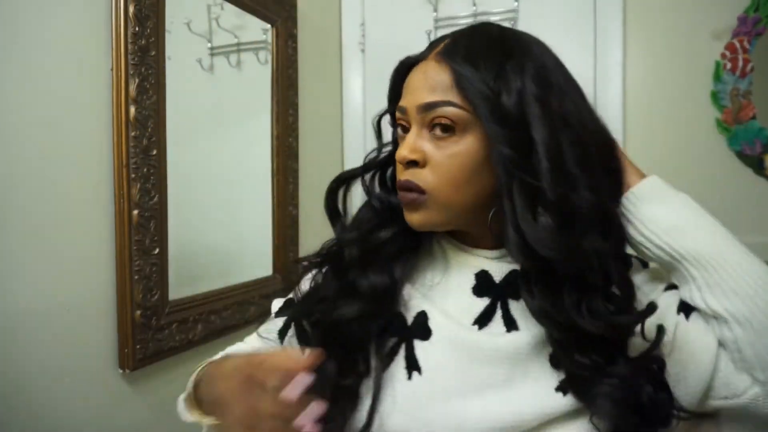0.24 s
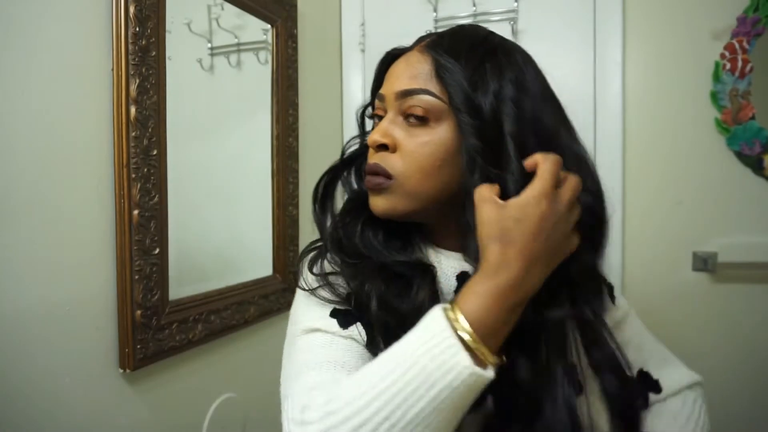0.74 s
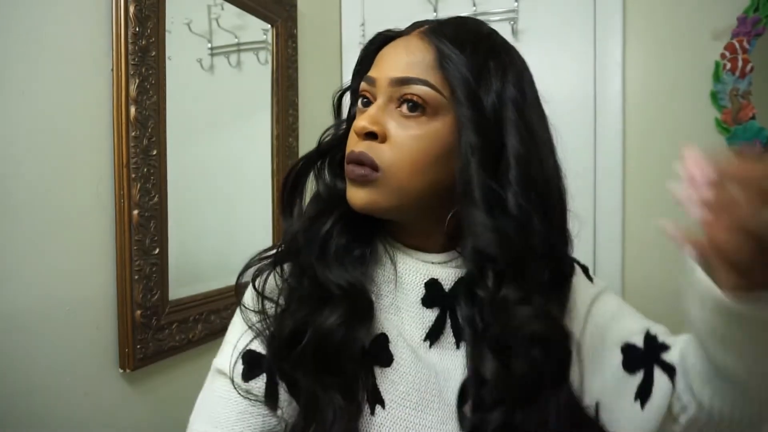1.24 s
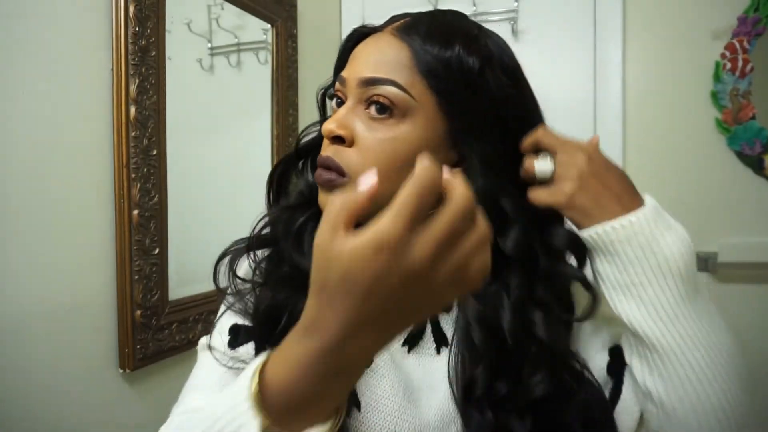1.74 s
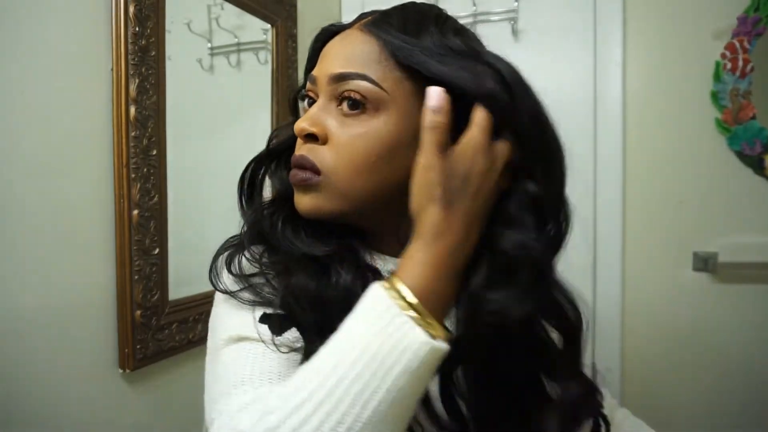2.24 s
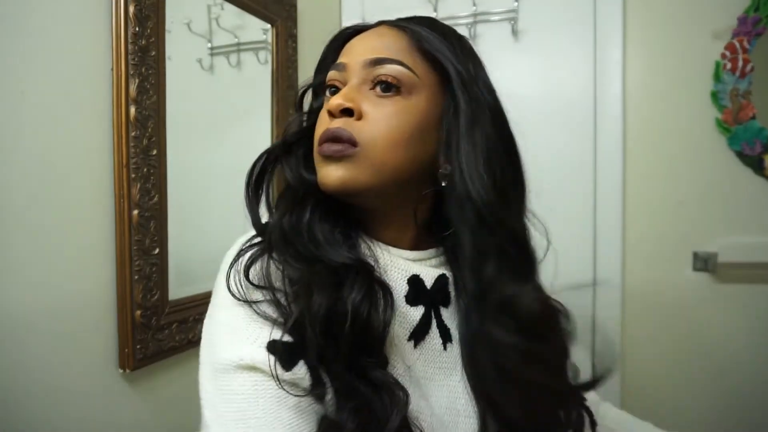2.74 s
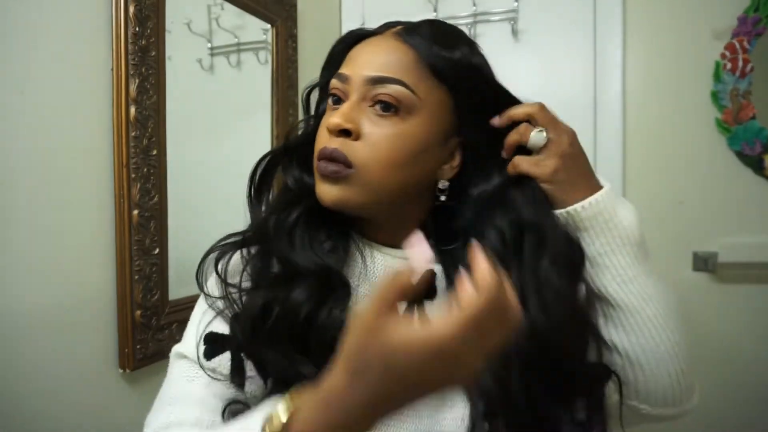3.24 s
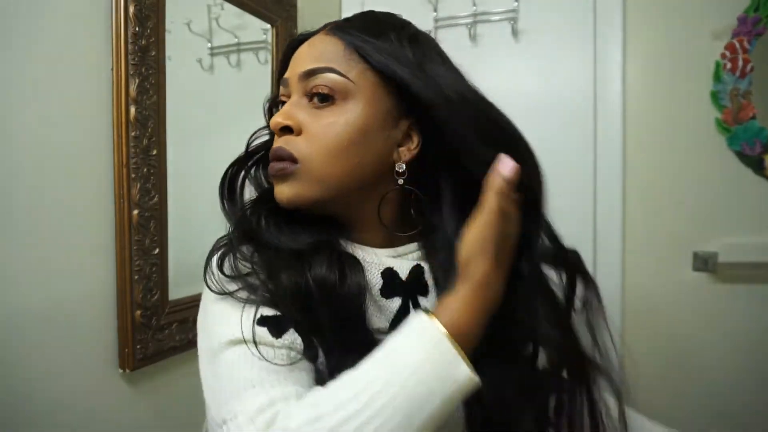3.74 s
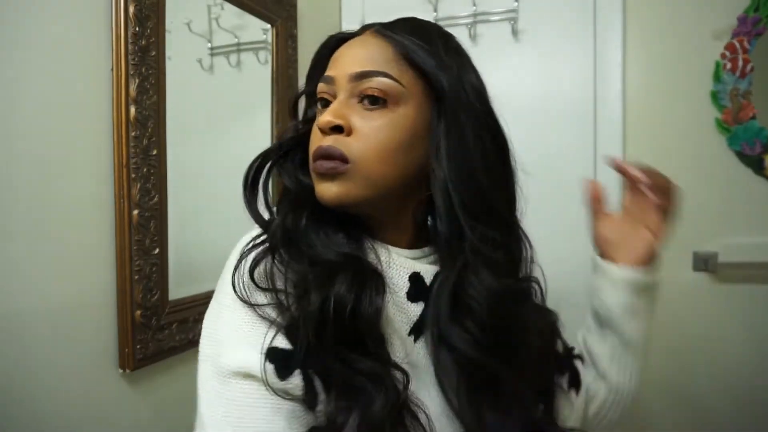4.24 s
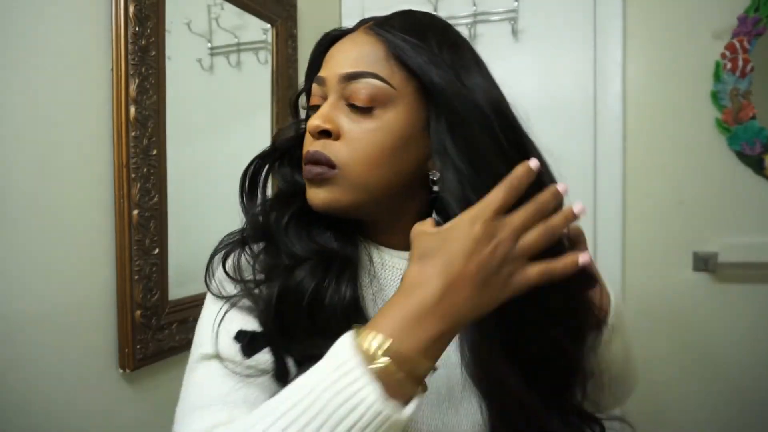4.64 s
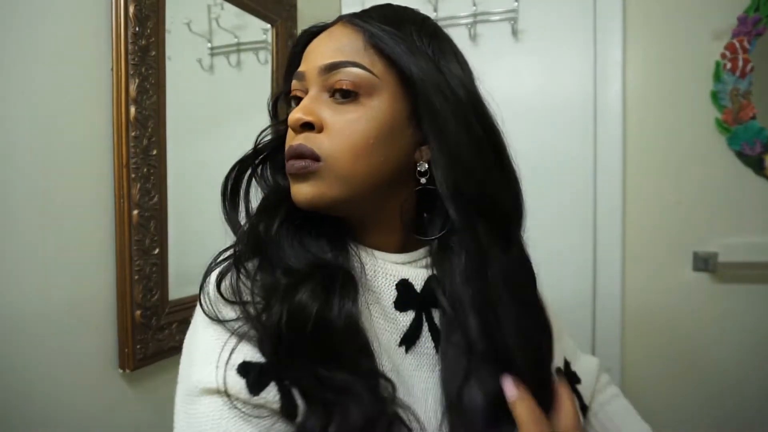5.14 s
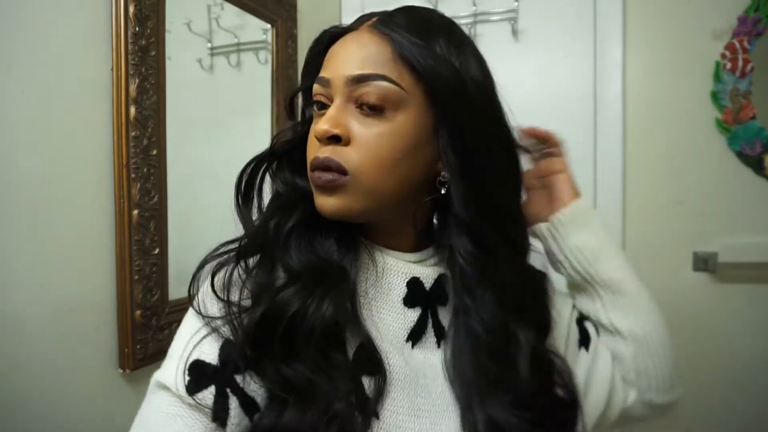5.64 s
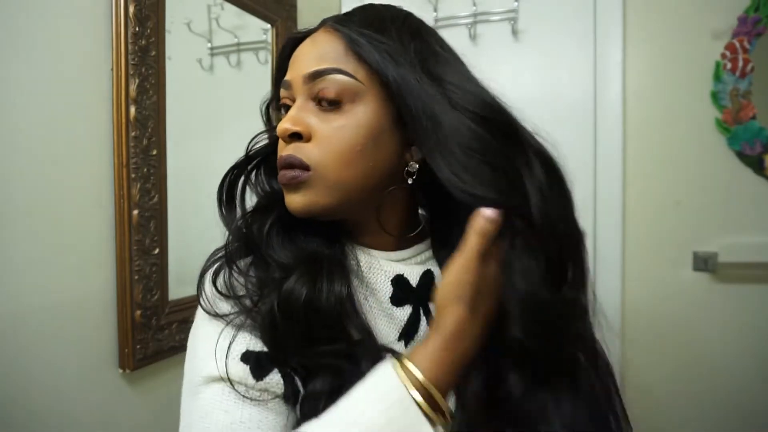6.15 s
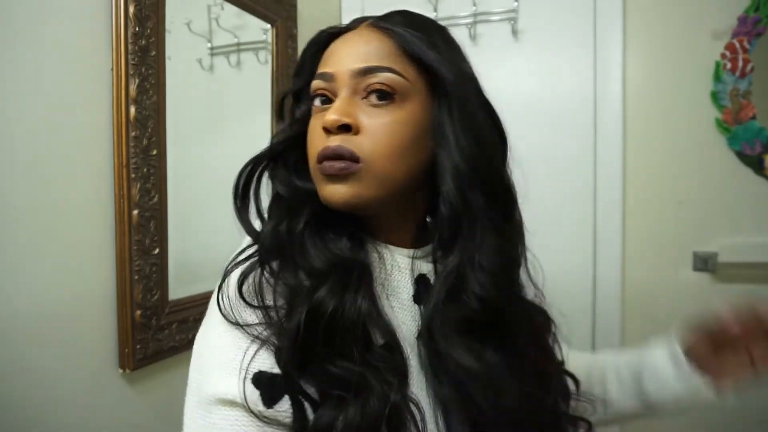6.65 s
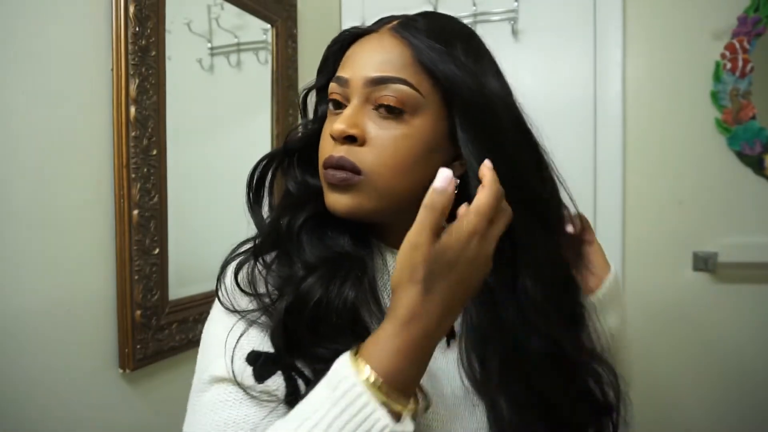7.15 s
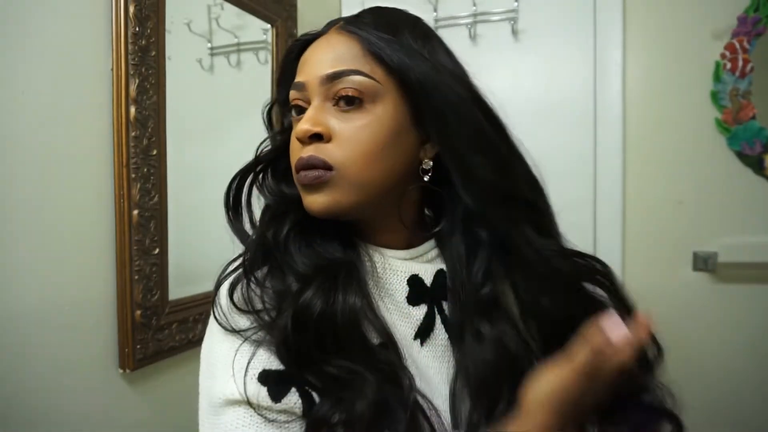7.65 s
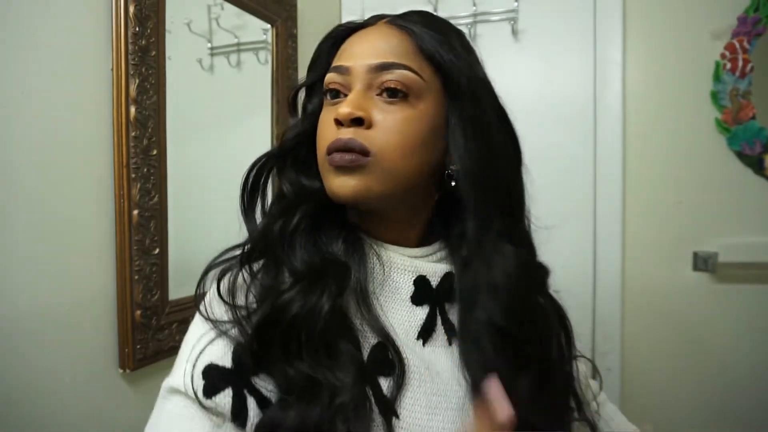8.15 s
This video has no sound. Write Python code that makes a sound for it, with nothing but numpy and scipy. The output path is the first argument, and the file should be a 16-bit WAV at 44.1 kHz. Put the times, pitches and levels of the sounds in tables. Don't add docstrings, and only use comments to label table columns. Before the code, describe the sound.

Two metal bangles jingle and chatter in bright uneven bursts as hands comb long hair, over a steady low fan hum in a small tiled room.

```python
import sys
import numpy as np
from scipy import signal
from scipy.fft import rfft, irfft, next_fast_len
from scipy.io import wavfile
from scipy.ndimage import uniform_filter1d, minimum_filter1d

SR = 44100
rng = np.random.default_rng(int(sys.argv[2]) if len(sys.argv) > 2 else 0)


def volts_from_decibels(level):
    exponent = np.asarray(level, float) / 20
    return 10 ** exponent


def log_audio(samples):
    frames = np.atleast_2d(samples).T
    limited = np.clip(frames, -1, 1)
    pcm = np.round(limited * 32767).astype(np.int16)
    wavfile.write(sys.argv[1], SR, pcm)


N = 369999

# (frequency [Hz], density [dB per Hz])
AIR_SPECTRUM = [(20, -11.5), (48, -54), (95, -6), (140, -9.5), (200, -10), (300, -10.5), (500, -18),
                (730, -24), (1000, -28), (1510, -31.5), (3940, -36), (6910, -43.5), (13200, -39.5),
                (16000, -39.5)]
# (frequency [Hz], side over mid [dB])
AIR_WIDTH = [(60, -37), (150, -18.5), (380, -8.5), (950, 0.5), (2380, -3), (5980, 6.5), (15000, 0)]
# (frequency [Hz], bandwidth [Hz], level [dB])
DUCT_RESONANCES = [(73.9, 14.2, -54.5), (135.7, 4.7, -60), (220.8, 12.5, -56.5), (332.6, 18, -64.5),
                   (1101, 35, -74.5)]
# (frequency [Hz], level [dB rms])
MOTOR_HUM = [(120, -48.5), (240, -58), (360, -68.5), (480, -71.5)]
# (frequency [Hz], t60 [s])
ROOM_DECAY = [(300, 0.59), (2500, 0.33), (8000, 0.29), (15000, 0.19)]
# (frequency [Hz], level [dB])
RUSTLE_BODY_SPECTRUM = [(500, -45), (1100, -5.5), (1600, -11), (2300, -2), (3300, -7), (5000, -13),
                        (7000, -25.5), (16000, -45)]
# (frequency [Hz], level [dB])
RUSTLE_SHEEN_SPECTRUM = [(2000, -40), (4000, -17), (8000, -3), (12000, -4.5), (15500, -29)]
# (peak time [s], level [dB], swell [s], fade [s], sheen above the body [dB])
HAIR_STROKES = [(.1, -57.5, 0.4, 0.093, -27), (.21, -60.5, 0.068, 0.44, -19),
                (.42, -55.5, 0.54, 0.26, -9.5), (.65, -59.5, 0.36, 2.7, -13),
                (0.935, -47.5, .005, 0.18, -18), (1.45, -72, 0.38, 1, -2), (1.85, -59.5, 0.99, 0.53, -10),
                (2.123, -44, 0.004, 0.027, -12), (2.45, -71, 0.43, 0.63, 5.5), (2.78, -62.5, 0.36, .8, -16),
                (3.08, -67, 0.065, 0.072, -7), (3.34, -62, 0.14, 3.6, -2), (4.04, -58.5, 0.3, 0.34, -16),
                (4.37, -54.5, 0.34, 0.13, -23), (4.55, -61.5, 0.54, 1.4, -9), (4.7, -51, 0.059, 0.13, 9),
                (5.21, -51.5, 0.17, 0.24, -13), (5.3, -52, 0.22, 0.081, -8), (5.65, -60.5, 0.75, 0.25, -2),
                (5.77, -61.5, 0.11, 4.8, -5), (6.47, -55, 0.096, 0.095, -7), (6.99, -56, 0.073, 0.51, 0.5),
                (7.2, -63, 0.54, 2.6, -17), (8.39, -74, .2, .2, -4)]
# (time [s], nail [dB], thud [dB], snap [dB], edge [dB])
NAIL_TICKS = [(0.1992, -49, -57, -63, -60), (0.9305, -42, -55, -41.5, -70), (1.3396, -44.5, -73, -63, -47),
              (2.1214, -48, -43, -44, -58), (3.0698, -44.5, -90, -74, -45.5),
              (4.3602, -51.5, -56, -65, -68), (4.4387, -70, -64, -77, -74), (4.4932, -59, -59, -68, -68),
              (5.6344, -52.5, -77, -63, -57), (6.4632, -62, -49.5, -56, -69),
              (6.8773, -50.5, -79, -92, -60)]
# (from [Hz], to [Hz], level [dB])
TICK_LAYERS = [
    (2330, 3650, 12.5),
    (269, 700, 8.5),
    (865, 2840, 5.5),
    (7600, 9500, 11.5),
    (11200, 14800, 10),
]
THIN_MODES_HZ = [1245, 1272, 3950, 4067, 7967, 8188, 9380, 9475, 10350, 12860, 13066, 13370, 13570, 14530,
                 6060, 10900]
# (level [dB], t60 [s])
THIN_MODES = [(-16.5, 0.054), (-12.5, 0.17), (-1.5, 0.16), (5.5, 0.11), (1, 0.084), (3, 0.04), (-37, 0.054),
              (-9.5, 0.033), (-19, 0.061), (-46, .08), (-3, 0.08), (0.5, 0.045), (-25, .08), (-18, .06),
              (-13, 0.027), (-24.5, 0.15)]
WIDE_MODES_HZ = [1930, 1985, 3652, 3792, 5490, 5891, 6101, 8614, 8917, 9175, 11500, 11765, 12150, 12240,
                 15120, 15410]
# (level [dB], t60 [s])
WIDE_MODES = [(2, 0.091), (1, 0.12), (-1.5, 0.087), (2.5, 0.036), (-13, 0.07), (-4.5, 0.1), (3.5, 0.059),
              (-2, 0.05), (1, 0.049), (-4, 0.044), (-17, 0.11), (-0.5, 0.057), (5.5, 0.032), (-32, 0.05),
              (-13, 0.1), (3, 0.049)]
# (from [Hz], to [Hz])
THIN_TILT_HZ = (4070, 13200)
# (from [Hz], to [Hz])
WIDE_TILT_HZ = (1960, 11900)
# (time [s], thin level [dB], wide level [dB],
# thin brightness [dB per octave], wide brightness [dB per octave])
WRIST_CLASHES = [(0.0, -39.5, -41, 13, 8.2), (0.16, -37.5, -45, 11, 4.4), (0.4037, -46, -52, 10, 4),
                 (1.25, -55, -64, 6.7, 2.7), (1.4165, -32, -43, 11.3, 3.7), (1.58, -39.5, -51, 11.3, 10),
                 (2.7244, -30.5, -30.5, 13, 22), (3.2578, -22, -31.5, 12.3, 8.5),
                 (3.388, -38, -39.5, 12.7, 4), (3.8774, -64, -56, 4, 4), (4.2423, -32.5, -32.5, 9.1, 7.5),
                 (4.5954, -30, -36.5, 14.7, 8), (4.686, -18.5, -22.5, 16, 9.5), (5.153, -52, -48, 10, 6),
                 (5.3608, -48, -40.5, 10.7, 6.3), (5.668, -31, -33.5, 16, 11.3),
                 (5.791, -25.5, -24, 11.3, 6.8), (6.501, -35, -35.5, 16.6, 8.3),
                 (6.981, -46.5, -40, 3.8, 11.6), (7.107, -23, -27.5, 12.7, 8.2), (7.725, -52, -57, 12, 4),
                 (7.8982, -36, -44, 7.6, 8), (8.136, -35, -45, 17, 12), (8.288, -41, -42, 8.7, 8)]
# (time [s], thin level [dB], wide level [dB], brighter
# than the clash before [dB per octave])
BOUNCES = [(1.592, -34.5, -36.5, 3.5), (1.604, -38.5, -43.5, -2.5), (2.759, -25, -42, 6),
           (2.795, -31, -55, -2.5), (2.829, -28.5, -42, -3.5), (3.273, -24.5, -45, 0),
           (3.299, -21, -31.5, 5.5), (3.435, -36, -39, 20), (3.92, -64, -58, -3.5), (4.052, -66, -57.5, 3),
           (4.259, -21, -34.5, 17), (4.305, -50, -61, 7), (4.608, -15.5, -32, 6.5),
           (4.6487, -37.5, -67, -10.5), (4.749, -55, -60, -6), (5.198, -45.5, -46.5, -2.5),
           (6.814, -60, -59, -5), (5.3776, -26.5, -35.5, 1), (5.43, -24, -32.5, 6), (5.742, -41, -35.5, -4),
           (5.8385, -30.5, -42, .1), (5.8785, -21.5, -24.5, 2), (5.9294, -30, -40, 12),
           (6.538, -28, -46, -1.3), (6.583, -24.5, -39, -0.5), (6.63, -29, -37, 0.5),
           (7.9215, -24.5, -44, 6.5), (7.9825, -31.5, -31.5, 4.5), (8.3145, -44, -39.5, -0.5),
           (8.364, -32, -43, 4)]


def evened(x):
    return x / np.sqrt(np.mean(x ** 2) + 1e-20)


def read(points, hz):
    f, value = np.transpose(points)
    return np.interp(np.log(hz + 1), np.log(f + 1), value)


def tint(x, points):
    size = next_fast_len(N)
    gain = volts_from_decibels(read(points, np.fft.rfftfreq(size, 1 / SR)))
    return irfft(rfft(x, size) * gain, size)[..., :N]


def ring(x, hz, width_hz):
    r = np.exp(-np.pi * width_hz / SR)
    w = 2 * np.pi * hz / SR
    return signal.lfilter([0, r * np.sin(w)], [1, -2 * r * np.cos(w), r * r], x)


def drift(hz):
    return evened(ring(rng.standard_normal(N), 1e-3, hz))


def fan():
    mid_noise, side_noise = rng.standard_normal((2, N))
    mid = tint(mid_noise, AIR_SPECTRUM)
    side = tint(tint(side_noise, AIR_SPECTRUM), AIR_WIDTH)
    air = volts_from_decibels(-52.5) * np.array([mid + side, mid - side]) / np.std(mid)

    duct = np.zeros(N)
    for hz, width_hz, db in DUCT_RESONANCES:
        resonance = ring(ring(rng.standard_normal(N), hz, width_hz), hz, width_hz)
        duct += volts_from_decibels(db) * evened(resonance)

    t = np.arange(N) / SR
    waver = 0.45 * drift(4.1)
    hum = np.zeros(N)
    for hz, db in MOTOR_HUM:
        hum += volts_from_decibels(db + 2.5) * np.sin(2 * np.pi * (hz * t + rng.random()) + waver)
    return air + duct + hum * volts_from_decibels(0.54 * drift(7.3))


def room(x, wet_db, count=3):
    slots = np.arange(200, SR // 3 - 20, 20)
    turn = np.arange(N) / SR * 9.0 + rng.random() * np.pi
    out = x + np.zeros((2, N))
    for k in range(count):
        taps = np.zeros((2, SR // 3))
        at = slots + rng.integers(0, 20, (2, len(slots)))
        np.put_along_axis(taps, at, rng.choice([-1., 1.], (2, len(slots))), 1)
        hz, t, z = signal.stft(taps, SR, nperseg=128)
        build = 1 - np.exp(-t / 0.00057)
        decay = volts_from_decibels(-60 * t / read(ROOM_DECAY, hz)[:, None])
        tail = signal.istft(z * build * decay, SR, nperseg=128)[1]
        tail = tail + 0.073 * tail[::-1]
        tail /= np.linalg.norm(tail[0])
        share = np.sqrt(2 / count) * np.cos(turn + k * np.pi / count) if count > 1 else 1
        out += volts_from_decibels(wet_db) * signal.oaconvolve(x * share, tail, axes=1)[:, :N]
    return out


def strokes():
    rest_db, rest_sheen_db = -71, -2
    t = np.arange(0, N, 64) / SR
    peak_s, db, swell_s, fade_s, sheen_db = np.array(HAIR_STROKES).T[..., None]
    away = np.where(t < peak_s, (peak_s - t) / swell_s, (t - peak_s) / fade_s)
    power = volts_from_decibels(2 * db - 40 * away)
    body = power.sum(0) + volts_from_decibels(2 * rest_db)
    sheen = (power * volts_from_decibels(2 * sheen_db)).sum(0) + volts_from_decibels(2 * (rest_db + rest_sheen_db))
    return [np.interp(np.arange(N) / SR, t, np.sqrt(p)) for p in (body, sheen)]


def rustle():
    body_level, sheen_level = strokes()
    strength_db = 2.0 * np.minimum(rng.exponential(1, (2, N)), 5)
    slips = volts_from_decibels(strength_db) * rng.standard_normal((2, N))
    slips *= rng.random((2, N)) < 4000 / SR
    slips *= volts_from_decibels(1.5 * drift(25))
    slips = room(slips + .5 * slips[::-1], 0.33, count=1)
    body = evened(tint(slips, RUSTLE_BODY_SPECTRUM))
    sheen = evened(tint(slips, RUSTLE_SHEEN_SPECTRUM))
    return (body * body_level + sheen * sheen_level) * volts_from_decibels(-0.5)


def ticks():
    pan_db = -1.5
    s, *levels_db = np.transpose(NAIL_TICKS)
    levels_db.append(levels_db[-1])
    at = (s * SR).astype(int)
    side_db = np.array([[.5], [-.5]]) * pan_db
    out = 0
    for level_db, (lo_hz, hi_hz, db) in zip(levels_db, TICK_LAYERS):
        train = np.array([np.bincount(at, w, N) for w in volts_from_decibels(level_db + db + side_db)])
        band = signal.butter(4, [lo_hz, hi_hz], "bandpass", fs=SR, output="sos")
        click = signal.sosfilt(band, signal.unit_impulse(1500))
        out = out + signal.oaconvolve(train, click[None] / abs(click).max())[:, :N]
    return room(out, 1.0, count=1)


def knocks(which):
    clash, bounce = np.array(WRIST_CLASHES), np.array(BOUNCES)
    before = np.searchsorted(clash[:, 0], bounce[:, 0]) - 1
    clash_bright = clash[:, 3 + which]
    bounce_bright = clash_bright[before] + bounce[:, -1]
    s = np.r_[clash[:, 0], bounce[:, 0]]
    db = np.r_[clash[:, 1 + which], bounce[:, 1 + which]]
    return np.c_[s, db, np.r_[clash_bright, bounce_bright]]


def bangle(rows, modes_hz, modes, tilt_hz, swing):
    count, chatter_s = 14, 0.026
    s, level_db, bright = rows.T
    when = rng.random((len(rows), count))
    when[:, 0] = 0
    at = ((s[:, None] + when * chatter_s) * SR).astype(int).clip(0, N - 1).ravel()
    place = rng.standard_normal((len(rows), count, len(modes) + 1))
    place *= volts_from_decibels(-5.0 * when)[..., None]
    place[:, 0] = 1.4 * np.sign(place[:, 0])
    place /= np.linalg.norm(place, axis=1, keepdims=True)
    out = np.zeros(N)
    for k, (hz, (db, t60)) in enumerate(zip(modes_hz, modes)):
        blow_db = level_db + bright * np.log2(np.clip(hz, *tilt_hz) / tilt_hz[1])
        force = place[:, :, k] * volts_from_decibels(db + blow_db)[:, None]
        rung = ring(np.bincount(at, force.ravel(), N), hz, np.log(1000) / np.pi / t60)
        pressed = np.bincount(at, (force * place[:, :, k - 1]).ravel(), N)
        rung += volts_from_decibels(5) * ring(pressed, hz * 1.01, 230)
        out += rung * np.roll(swing, k * N // len(modes))
    contact = place[:, :, -1] * volts_from_decibels(level_db[:, None] - 4.0)
    return out + np.diff(np.bincount(at, contact.ravel(), N + 1))


def bangles():
    swing = volts_from_decibels(3.5 * drift(40))
    thin = bangle(knocks(0), THIN_MODES_HZ, THIN_MODES, THIN_TILT_HZ, swing)
    wide = bangle(knocks(1), WIDE_MODES_HZ, WIDE_MODES, WIDE_TILT_HZ, swing[::-1])
    return room(volts_from_decibels(-5.5) * (thin + wide)[None], 7.5)


def scene():
    return bangles() + ticks() + rustle() + fan()


def thin_treble(x, from_hz, below_db):
    bins = 8
    hz, _, z = signal.stft(x, SR, nperseg=512, noverlap=384)
    band = np.arange(len(hz)) // bins
    power = np.add.reduceat((abs(z) ** 2).sum(0), np.arange(0, len(hz), bins))
    level_db = 10 * np.log10(uniform_filter1d(power, size=7, axis=1) + 1e-20)
    treble = (np.arange(len(power)) >= band[np.searchsorted(hz, from_hz)])[:, None]
    nearby_db = -minimum_filter1d(-level_db * treble + 999 * ~treble, size=5, axis=0)
    loudest_db = -minimum_filter1d(-nearby_db, size=7, axis=1)
    cut_db = np.clip(15 * (loudest_db - below_db - level_db), 0, 50) * treble
    cut_db *= loudest_db > np.median(loudest_db, axis=1, keepdims=True) + 9
    return signal.istft(z * volts_from_decibels(-cut_db[band]), SR, nperseg=512, noverlap=384)[1][:, :N]


def top_cut(x):
    return signal.sosfilt(signal.butter(12, 17140, fs=SR, output="sos"), x)


def record(dry):
    thinned = thin_treble(dry, 3400, below_db=14.5)
    edge = signal.firwin(255, 15900, window=("kaiser", 6), fs=SR)
    mix = signal.oaconvolve(thinned, edge[None], "same")
    return top_cut(mix)


dry = scene()
out = record(dry)
log_audio(out)
```